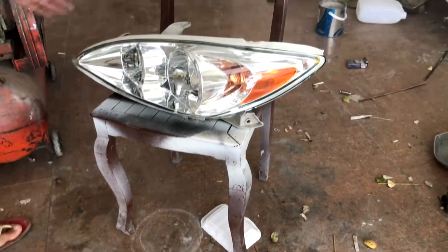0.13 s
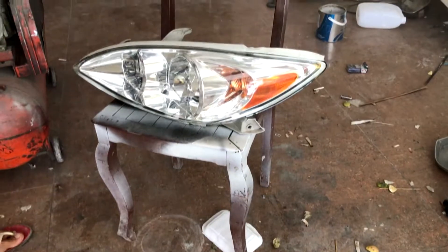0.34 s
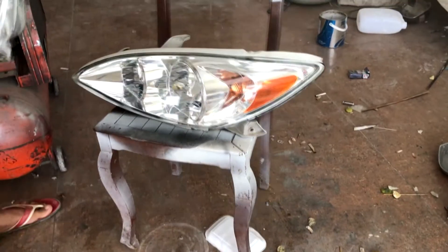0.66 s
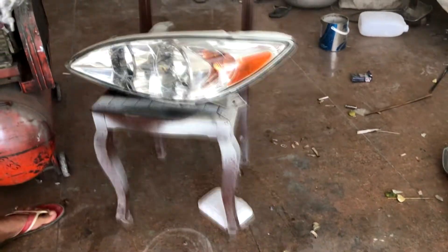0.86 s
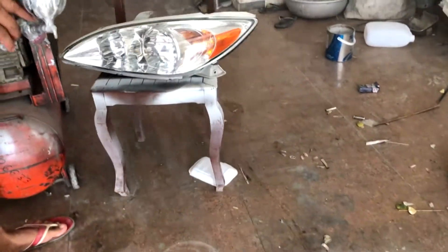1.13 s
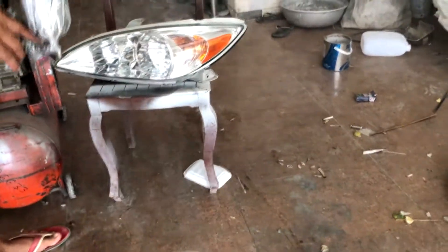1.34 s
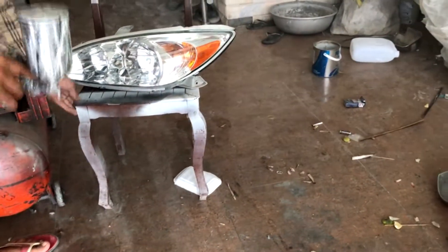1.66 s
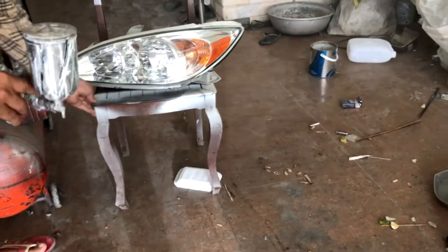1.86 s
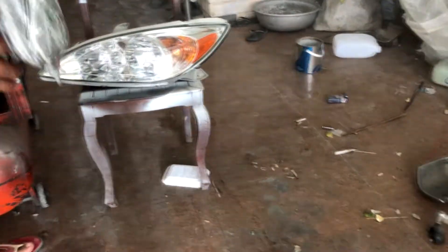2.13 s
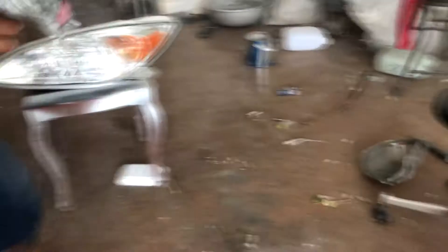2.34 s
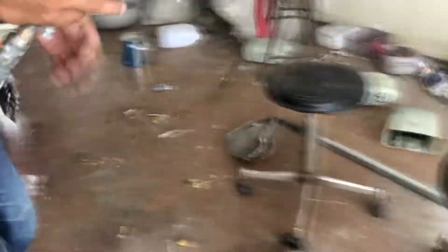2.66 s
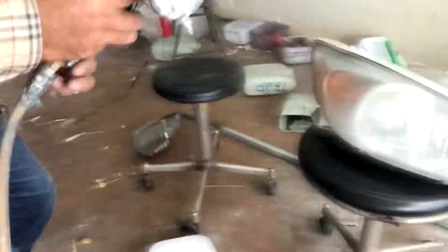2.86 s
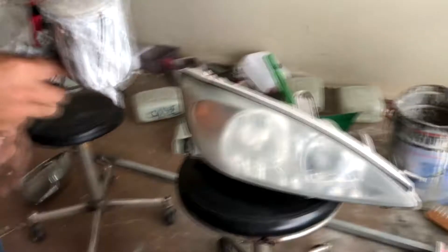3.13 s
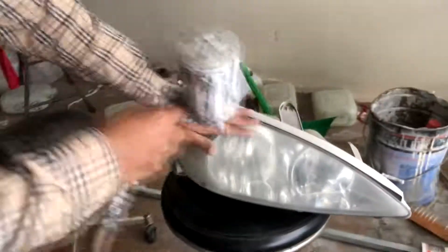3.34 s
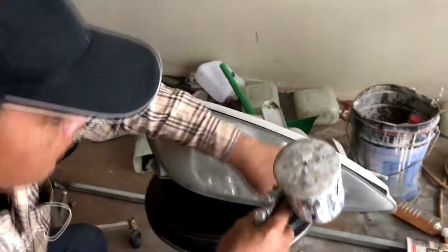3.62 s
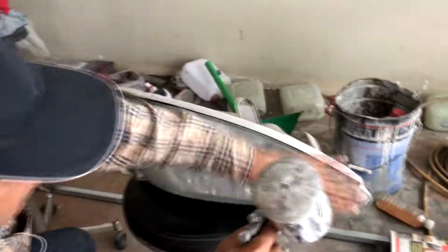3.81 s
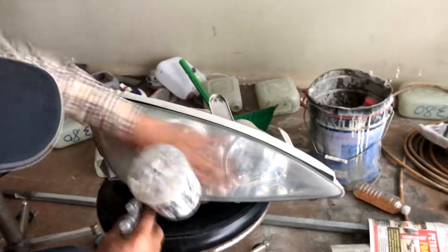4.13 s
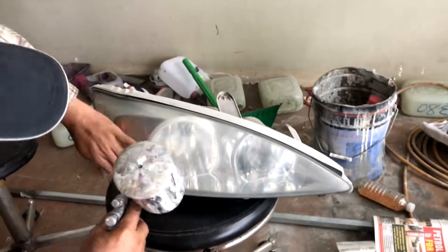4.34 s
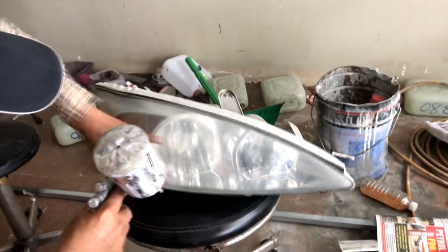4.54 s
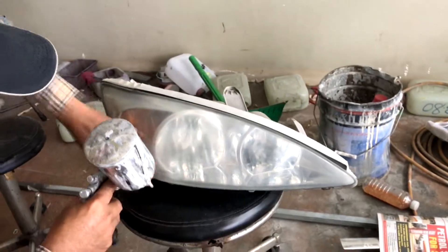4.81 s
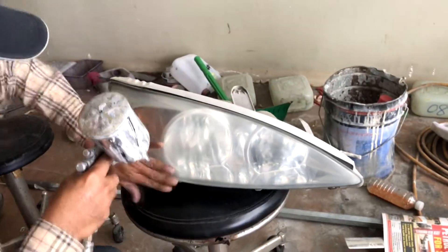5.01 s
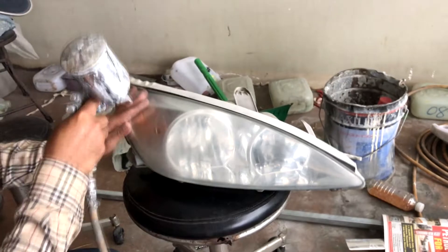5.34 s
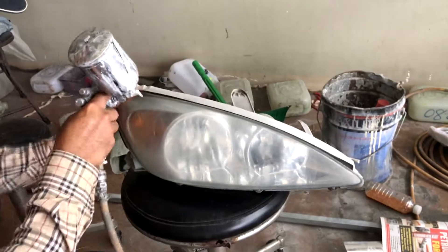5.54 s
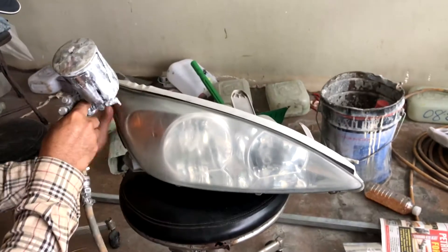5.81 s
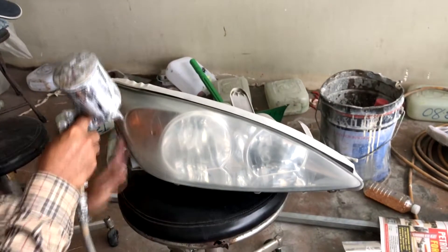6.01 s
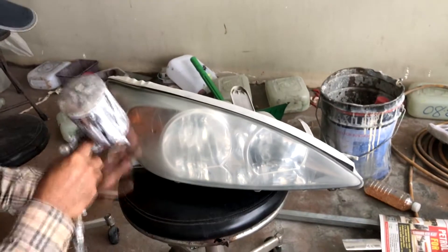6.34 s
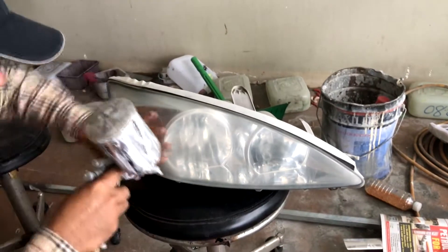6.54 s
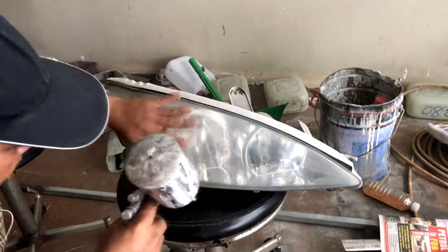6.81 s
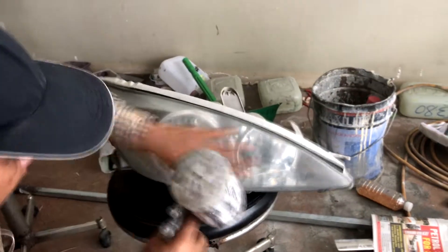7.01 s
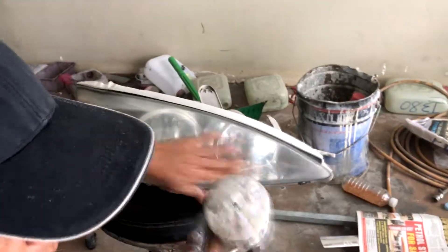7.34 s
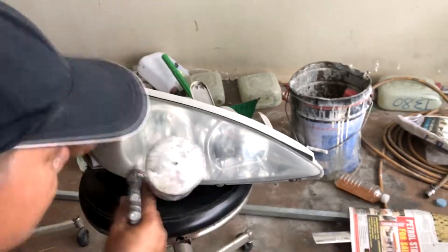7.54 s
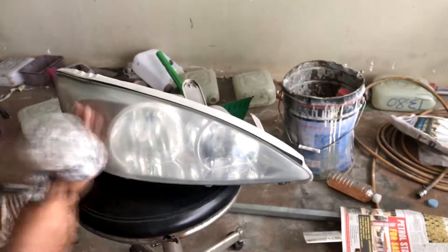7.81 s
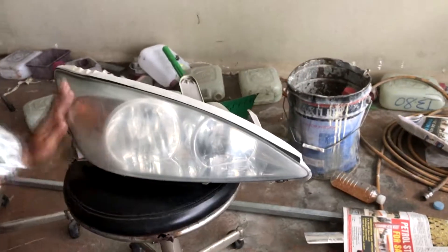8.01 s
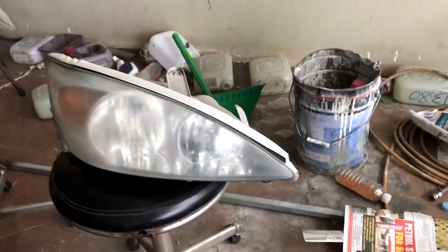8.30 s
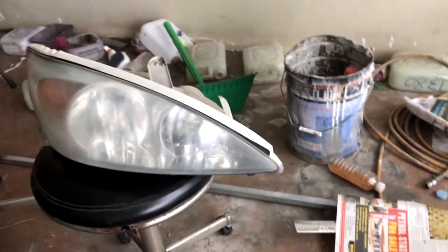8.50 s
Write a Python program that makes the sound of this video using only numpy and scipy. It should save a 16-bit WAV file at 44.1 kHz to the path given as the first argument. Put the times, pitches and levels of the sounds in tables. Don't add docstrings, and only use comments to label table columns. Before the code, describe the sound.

From 0 s a spray gun is already blowing, a strong, bright, steady hiss close to a phone microphone, shifting slightly in level and colour as it sweeps over a plastic lens. A faint fuzzy whistle near 7 kHz rides on it. Beneath are a wavering compressor hum with a blurred note near 940 Hz, an idling engine, low street rumble and a thin sizzling leak. At 2.1 s the jet cuts off; its hiss dies in the hard, ringing room while the hose sighs from about 1200 down to 700 Hz, gone by 2.5 s. Low background and a droning engine remain. At 2.8 s the jet snaps back with a very short, brighter burst, then sweeps continuously to the end at 8.7 s, whistling most clearly around 3 s and again in brief slides. Outside, a vehicle draws up from 4 s, is nearest around 5.4 s, and leaves by about 7 s.

```python
import sys
import numpy as np
from scipy import signal
from scipy.fft import rfft, irfft, next_fast_len
from scipy.io import wavfile
from scipy.ndimage import uniform_filter1d

SR = 44100
rng = np.random.default_rng(int(sys.argv[2]) if len(sys.argv) > 2 else 0)


def field_ratio(decibels):
    return 10 ** (np.asarray(decibels, dtype=float) / 20)


def dump_mix(stems):
    frames = np.atleast_2d(stems).T
    limited = np.clip(frames, -1, 1)
    pcm = np.round(limited * 32767).astype(np.int16)
    wavfile.write(sys.argv[1], SR, pcm)


N = 381888


def evened(x):
    return x / np.sqrt(np.mean(abs(x) ** 2) + 1e-20)


def read(points, hz):
    f, value = np.transpose(points)
    return np.interp(np.log(hz + 1), np.log(f + 1), value)


def columns(rows, t):
    s, *values = np.transpose(rows)
    return [np.interp(t, s, v) for v in values]


def bump(t, s, length):
    return np.exp(-(2 * (t - s) / length) ** 2)


def grid(size):
    hz = np.fft.rfftfreq(size, 1 / SR)[:, None]
    frames = np.arange(N * 4 // size + 5) * size / 4 / SR
    return hz, frames


def noise(field_db, patchy_db, size):
    a, b, patches = rng.standard_normal(field_db.shape[::-1] + (3,)).T
    patches = uniform_filter1d(patches, size[0], axis=0)
    patches = evened(uniform_filter1d(patches, size[1], axis=1))
    length = 2 * len(field_db) - 0.5
    z = (a + 1j * b) * field_ratio(field_db + patchy_db * patches)
    return evened(signal.istft(z, nperseg=length, noverlap=length * 3 // 4)[1][:N])


def resonate(x, hz, width):
    turn = np.exp(2j * np.pi * np.cumsum(hz * np.ones(len(x))) / SR)
    r = np.exp(-np.pi * width / SR)
    return 2 * (turn * signal.lfilter([1 - r], [1, -r], x / turn)).real


def whistle(hz, width):
    once = resonate(rng.standard_normal(N), hz, width)
    return evened(resonate(once, hz, width))


RELEASE_S, CLOSE_S = 2.101, 0.036
SQUEEZE_S, OPEN_DB_PER_S = 2.8085, 1200
BURST_DB, BURST_S = 4, 0.029


def trigger(t):
    since = t - SQUEEZE_S
    rising_db = BURST_DB + OPEN_DB_PER_S * since
    settling_db = BURST_DB * np.exp(-abs(since) / BURST_S)
    opening_db = np.where(since < 0, rising_db, settling_db)
    closing = np.clip(1 - (t - RELEASE_S) / CLOSE_S, 0, 1)
    return closing + field_ratio(np.maximum(opening_db, -200))


# pitch_hz, level_db (per Hz)
JET = [(400, -15.5), (1200, -12.5), (2000, -10), (2600, -6), (3600, -3.5), (4400, -3), (5600, -1),
       (6500, 0), (8500, 0.5), (9400, 0.5), (11500, 0.5), (13500, -1.5), (15700, -2.2)]
# time_s, nearness_db (to the microphone), splash_db (of the jet on the lens)
SWEEP = [(0, 1, .5), (.5, 0, 1), (1.2, 1, -1), (2.1, 0, 0), (2.85, -0.5, 0.5), (3.15, -1.5, 0.5),
         (3.5, -0.5, -1), (3.9, 0.5, -1.5), (4.35, 2.5, -1.5), (4.8, 1, 2), (5.3, 2, 0), (5.9, 0, -1.5),
         (6.4, -1.2, -0.1), (7.1, 2, -0.4), (7.8, 1.5, 1.5), (8.4, 1.5, 0), (8.66, -.5, 0)]
# loudest_s, length_s, level_db (against the jet), slide_hz
CAP = [(3.0, 0.38, -2, 50), (3.4, .25, -7, 100), (3.85, 0.4, -6, 400), (4.25, .4, -6, 28),
       (4.75, .4, -10, 30), (5.6, 0.27, -4.5, 397), (5.9, .4, -7, 30), (6.597, .2, -6, -200),
       (7.1, .35, -6, 150), (7.5, 0.56, -11, 100), (8.45, 0.28, -7, 200)]
JET_DB, CAP_HZ, CAP_REST_DB = -31, 6930, -11.5
NEAR_ALL, NEAR_TREBLE, NEAR_LOW = 0.47, 0.53, 0.94
RIDGE_HZ, RIDGE_WIDTH_HZ, RIDGE_DB = 4460, 300, 1.6
BURST_TREBLE_DB, BURST_HZ, BURST_BRIGHT_S = 6, 7500, 0.028


def gun():
    hz, frames = grid(size=512)
    near_db, splash_db = columns(SWEEP, frames)
    high = 1 / (1 + (10200 / (hz + 1)) ** 12)
    low = 1 / (1 + (hz / 2600) ** 4)
    middle = 1 / (1 + (hz / 7000) ** 8) - low
    field_db = read(JET, hz) + (NEAR_TREBLE * high + NEAR_LOW * low) * near_db + middle * splash_db
    field_db += RIDGE_DB / (1 + (2 * (hz - RIDGE_HZ) / RIDGE_WIDTH_HZ) ** 2)
    bright = bump(frames, SQUEEZE_S + 0.003, BURST_BRIGHT_S)
    field_db += BURST_TREBLE_DB * bright / (1 + (BURST_HZ / (hz + 1)) ** 2)
    hiss = noise(field_db, 1.6, size=(3, 60))

    t = np.arange(N) / SR
    cap_hz = CAP_HZ - sum(slide * bump(t, s - length / 2, length) for s, length, db, slide in CAP)
    cap = field_ratio(CAP_REST_DB) + sum(field_ratio(db) * bump(t, s, length) for s, length, db, slide in CAP)
    jet = hiss + field_ratio(-9.5) * cap * whistle(cap_hz, 450)
    flutter_db = 0.5 * evened(uniform_filter1d(rng.standard_normal(N), 400))
    level_db = JET_DB + NEAR_ALL * columns(SWEEP, t)[0] + flutter_db
    return field_ratio(level_db) * trigger(t) * jet


# pitch_hz, t60_s
ROOM = [(500, 2.1), (2000, 1.66), (6000, 1.23), (10000, 0.79), (15000, 0.64)]


def room(x):
    hz, t, z = signal.stft(rng.standard_normal(SR), SR, nperseg=256)
    decay_db = -60 * t / read(ROOM, hz)[:, None]
    tail = signal.istft(z * field_ratio(decay_db), SR, nperseg=256)[1]
    lead = np.concatenate([x[:SR][::-1], x])
    return signal.fftconvolve(lead, tail / np.linalg.norm(tail))[SR:SR + N]


# multiple (of the shaft rate), level_db
ORDERS = [(12, -68), (15, -64.5), (16, -52.5), (17, -61), (19, -63), (21, -70), (22, -69)]
# time_s, pitch_hz, level_db
INTAKE = [
    (0, 938, -58.5),
    (2, 952, -58),
    (2.5, 917, -65),
    (4.2, 937, -59),
    (5.5, 939, -65.5),
    (8.7, 946, -60),
]
SHAFT_HZ, HUM_FADE_DB_PER_S, HUM_WAVER = 16.1, 0.22, 0.11


def compressor():
    t = np.arange(N) / SR
    knots = np.arange(0, t[-1] + 0.2, 0.12)
    hum = np.zeros(N)
    for k, db in ORDERS:
        waver = 1 + HUM_WAVER * np.interp(t, knots, rng.standard_normal(len(knots)))
        hum += field_ratio(db + 3.0) * waver * np.sin(2 * np.pi * (k * SHAFT_HZ * t + rng.random()))
    intake_hz, intake_db = columns(INTAKE, t)
    return field_ratio(-HUM_FADE_DB_PER_S * t) * hum + field_ratio(intake_db) * whistle(intake_hz, 47)


# time_s, firing_hz
SPEED = [(0, 20.2), (3, 19.6), (3.6, 19.1), (3.87, 19.6), (4.17, 20.9), (4.4, 21.2), (5, 21.1), (5.4, 20.3),
         (5.75, 19.8), (6.5, 19.6), (7.05, 18.8), (7.5, 20.5), (8.2, 19.4), (8.66, 19)]
# multiple (of the firing rate), level_db
IDLE = [(4, -64), (5, -55.5), (6, -58.5), (7, -60.5), (8, -59.5), (10, -68.5)]
# loudest_s, length_s, multiple, level_db
BOOMS = [(1.2, 0.56, 4, -52), (1.85, .2, 4, -50), (2.5, 0.81, 4, -51.5), (4.05, 0.23, 4, -43),
         (4.7, 0.36, 4, -47), (5.35, 0.4, 4, -43.5), (5.95, 0.27, 4, -63), (7.303, 0.55, 4, -51.5),
         (0, 0.29, 5, -47), (.85, 0.27, 5, -53), (1.697, 0.34, 5, -51), (2.6, .8, 5, -52),
         (3.75, 1, 5, -47.5), (4.8, 0.76, 5, -46.5), (5.9, 0.74, 5, -43.5), (7.053, 0.16, 5, -45),
         (7.45, 0.21, 5, -45.5), (8.3, 0.54, 5, -48), (3.9, .5, 6, -47.5), (4.35, 0.25, 6, -56),
         (5, 0.62, 6, -47), (5.55, 0.34, 6, -52), (7.05, 0.38, 6, -53), (3.9, .3, 7, -51),
         (4.5, 0.73, 7, -46.5), (5.5, 0.46, 7, -52), (6.352, .4, 7, -50.5), (4.75, 0.33, 8, -46.5),
         (4.5, 0.67, 10, -60), (5.5, .5, 10, -55)]


def engine():
    t = np.arange(N) / SR
    uneven = 1 + 0.007 * evened(uniform_filter1d(rng.standard_normal(N), 5000))
    turns = np.cumsum(columns(SPEED, t)[0] * uneven) / SR
    out = np.zeros(N)
    for k, idle_db in IDLE:
        booms = sum(field_ratio(db) * bump(t, s, length) for s, length, which, db in BOOMS if round(which) == round(k))
        out += (field_ratio(idle_db) + booms) * np.sin(2 * np.pi * (round(k) * turns + rng.random()))
    return out


# pitch_hz, level_db (per Hz)
ROAD = [(15, -58), (30, -32), (45, -9), (85, 6), (107, -0.5), (146, -3), (205, -1.5), (254, -10.5),
        (277, -9.5), (307, -11), (500, -25), (700, -75)]
# time_s, nearness_db
STREET = [
    (0, 1),
    (1.2, -.5),
    (2.8, 1),
    (3.4, 1),
    (4, 3),
    (4.7, 3.5),
    (5.4, 5),
    (6.4, 2.5),
    (7.2, 1),
    (8.66, 0),
]
# start_s, length_s, pitch_hz, level_db
ENGINES = [
    (2.252, 1.4, 153.6, -50.5),
    (3.95, 0.5, 153.8, -47.5),
    (4.95, 0.72, 138.2, -50.5),
    (7.95, 0.69, 151, -53.5),
]
RUMBLE_DB, UPPER_FOLLOWS, DRIFT_HZ_PER_S = -49, 0.17, 1.524


def traffic():
    hz, frames = grid(size=2048)
    upper = 1 / (1 + (120 / (hz + 1)) ** 6)
    field_db = read(ROAD, hz) + UPPER_FOLLOWS * columns(STREET, frames)[0] * upper
    t = np.arange(N) / SR
    out = field_ratio(RUMBLE_DB + columns(STREET, t)[0]) * noise(field_db, 1.13, size=(2, 20))
    for start, length, firing_hz, db in ENGINES:
        since = np.clip(t - start, 0, length)
        heard = np.minimum(np.minimum(since, length - since) / 0.15, 1)
        hz = firing_hz + DRIFT_HZ_PER_S * (since - length / 2)
        tone = np.sin(2 * np.pi * np.cumsum(hz) / SR)
        out += field_ratio(db) * heard * (tone + 0.29 * whistle(hz, 6.3))
    return out


# pitch_hz, level_db (per Hz)
YARD = [(180, -36), (300, -7.5), (420, -18), (600, -11.5), (1000, -15), (1750, -10.5), (2050, -15.5),
        (3500, -17), (5000, -21.5), (6200, -19.5), (7500, -26), (10000, -28), (12000, -34), (16000, -43)]
# pitch_hz, width_hz, level_db
LEAK = [
    (8180, 480, -62),
    (8960, 400, -67),
]
YARD_DB = -50.5


def yard():
    hz, frames = grid(size=1024)
    wash = field_ratio(YARD_DB) * noise(read(YARD, hz) + 0 * frames, 1.8, size=(10, 14))
    return wash + sum(field_ratio(db) * whistle(f, width) for f, width, db in LEAK)


# time_s, pitch_hz, level_db
SIGH = [
    (2.1, 1350, -70),
    (2.15, 1190, -51.5),
    (2.24, 990, -50),
    (2.31, 888, -53),
    (2.36, 740, -53),
    (2.42, 706, -57),
    (2.49, 674, -77),
]


def hose():
    hz, db = columns(SIGH, np.arange(N) / SR)
    breath = whistle(hz, 260) + field_ratio(-5) * whistle(1.9 * hz, 650)
    return field_ratio(np.where(db > SIGH[0][2], db, -140)) * breath


FRAME, FRAME_START = 1024, 38
FILL_COUNT, FILL_LO_HZ, FILL_HI_HZ, FILL_WIDTH_HZ = 50, 4200, 14400, 1350


def fills(mid, db):
    n, k = np.arange(2 * FRAME), np.arange(FRAME) + 0.5
    basis = np.cos(np.pi / FRAME * np.outer(k, n + 0.5 + FRAME / 2))
    basis *= np.sin(np.pi * (n + 0.5) / (2 * FRAME)) * np.sqrt(2 / FRAME)
    places = rng.random((FILL_COUNT, 2))
    chances = rng.standard_normal((FILL_COUNT, FRAME))
    side = np.zeros(N)
    for (when, where), chance in zip(places, chances):
        start = FRAME_START + FRAME * int(when * (N // FRAME - 2))
        lo_hz = FILL_LO_HZ + where * (FILL_HI_HZ - FILL_LO_HZ)
        lo_bin = round(lo_hz * 2 * FRAME / SR)
        hi_bin = round((lo_hz + FILL_WIDTH_HZ) * 2 * FRAME / SR)
        band = slice(lo_bin, hi_bin)
        level = np.std(basis[band] @ mid[start:start + 2 * FRAME])
        side[start:start + 2 * FRAME] += field_ratio(db) * level * chance[band] @ basis[band]
    return side


# pitch_hz, width_hz, level_db
PORT = [
    (4900, 220, -2.5),
    (7680, 570, -4),
    (10390, 580, -6),
]
EDGE_HZ = 15780


def microphone(dry):
    size = next_fast_len(N)
    hz = np.fft.rfftfreq(size, 1 / SR)
    port_db = sum(db / (1 + (2 * (hz - f) / width) ** 2) for f, width, db in PORT)
    edge = np.clip((EDGE_HZ - hz) / 50, 0, 1)
    return irfft(rfft(dry, size) * field_ratio(port_db) * edge, size)[:, :N]


def scene():
    echoes = room(gun())
    mix = gun() + field_ratio(-6.5) * echoes + compressor() + engine() + traffic() + yard() + hose()
    return np.array([mix, mix])


def roll_off(x):
    return signal.sosfilt(signal.butter(12, 17080, fs=SR, output="sos"), x)


def record(dry):
    heard = microphone(dry)
    side = fills(heard[0], db=-1.0)
    return roll_off(heard + [side, -side])


dry = scene()
out = record(dry)
dump_mix(out)
```